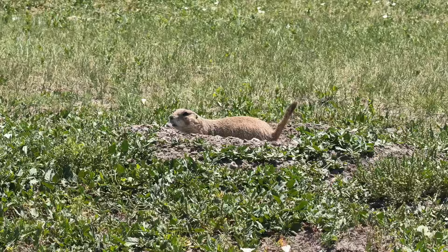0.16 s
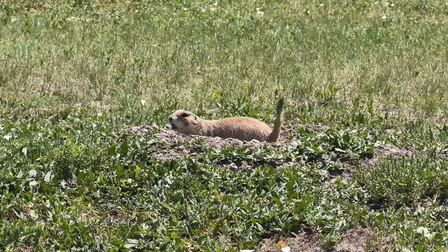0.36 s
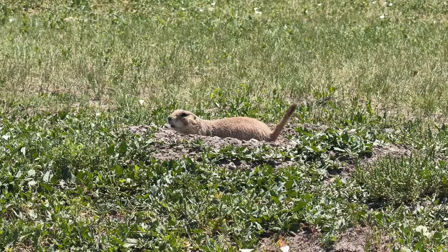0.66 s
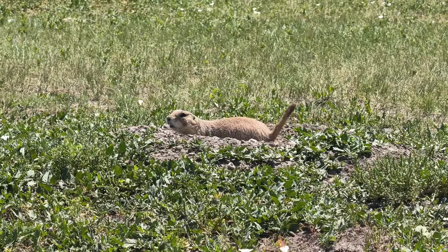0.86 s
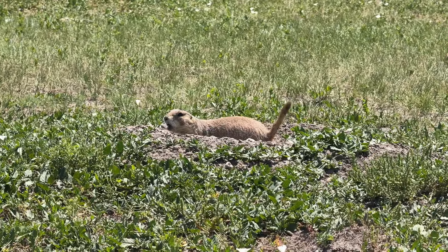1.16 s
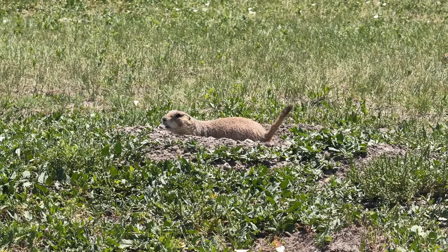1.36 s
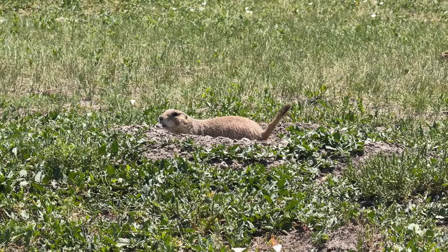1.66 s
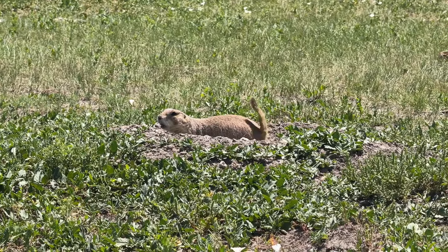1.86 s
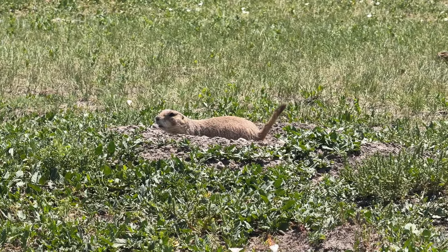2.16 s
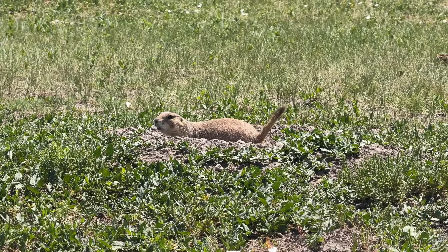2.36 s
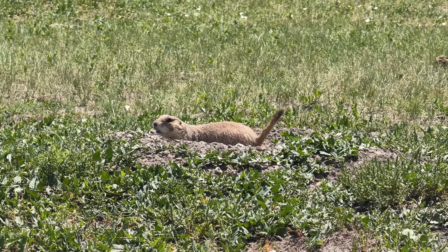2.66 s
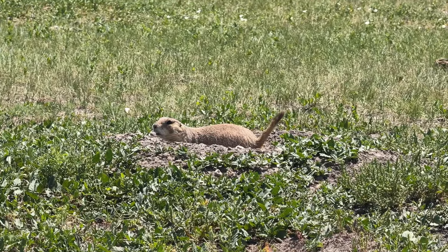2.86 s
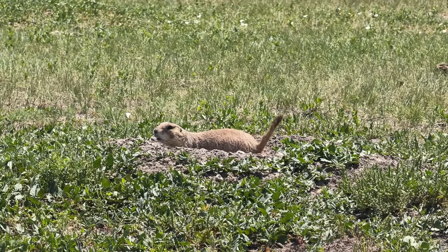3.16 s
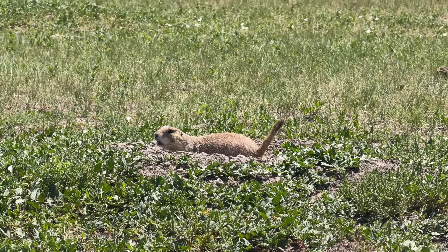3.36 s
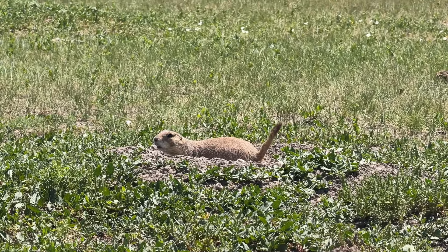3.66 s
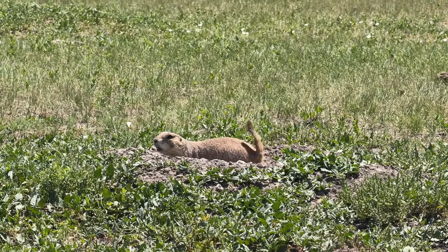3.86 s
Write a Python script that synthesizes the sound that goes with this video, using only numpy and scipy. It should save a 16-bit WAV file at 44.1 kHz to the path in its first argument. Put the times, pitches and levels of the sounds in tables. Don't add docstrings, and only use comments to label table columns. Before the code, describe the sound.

Open, dry-sounding grassland, heard through a small stereo camera microphone. A light stem tap comes at the very start, over low uneven wind rumble, very faint grass rustle and hiss. A prairie dog fairly close ahead gives seven sharp, high, squeaky barks at about 0.35, 1.13, 1.8, 2.4, 2.93, 3.38 and 3.79 seconds, gradually quickening. Each lasts only a twentieth of a second, rising quickly then falling in pitch, bright and slightly rough with a throat flutter and a puff of breath. About a tenth of a second after each comes a tiny creaky in-breath, briefly buzzing near 3.05. A distant neighbour adds thin, faint, falling whistles near 0.5, 1.3, 1.87, 2.47, 2.96 and 3.85. Wind eddies flutter and thump throughout, with the heaviest bumps from 1.9 to 2.3 seconds, then lighter buffeting until the end at about four seconds.

```python
import sys
import numpy as np
from scipy import signal
from scipy.fft import rfft, irfft, next_fast_len
from scipy.io import wavfile
from scipy.ndimage import uniform_filter1d, map_coordinates

SR = 44100
rng = np.random.default_rng(int(sys.argv[2]) if len(sys.argv) > 2 else 0)


def linear_from_db(decibels):
    return 10 ** (np.asarray(decibels, float) / 20)


def store_pcm(level_fs):
    pcm = np.round(np.clip(level_fs, -1, 1) * 32767).astype(np.int16)
    wavfile.write(sys.argv[1], SR, np.atleast_2d(pcm).T)


N = 176973


def unit(x):
    return x / np.sqrt(np.mean(x ** 2) + 1e-20)


def peak(x):
    return x / np.max(np.abs(x))


def along(points, hz):
    f, v = np.transpose(points)
    return np.interp(np.log(hz + 1), np.log(f + 1), v)


def wobble(rate, size=N):
    knots = rng.standard_normal(int(size * rate / SR) + 4)
    return map_coordinates(knots, [np.arange(size) * rate / SR])


def filtered(x, response):
    m = next_fast_len(x.shape[-1] + 8192)
    return irfft(rfft(x, m) * response(np.fft.rfftfreq(m, 1 / SR)), m)[..., :x.shape[-1]]


def noise(spectrum, size=N):
    return unit(filtered(rng.standard_normal(size), lambda hz: linear_from_db(along(spectrum, hz))))


def add(track, s, sound):
    part = track[round(s * SR):][:len(sound)]
    part += sound[:len(part)]


# freq_hz [Hz], density_db [dB per Hz]
HISS_SPECTRUM = [(1300, -24.5), (2200, -1.5), (3000, -11.5), (7300, -10), (9500, -17), (12500, -20),
                 (14400, -11), (16000, -22)]


def hiss():
    return linear_from_db(-85.5) * np.array([noise(HISS_SPECTRUM), noise(HISS_SPECTRUM)])


# freq_hz [Hz], density_db [dB per Hz]
RUSTLE_SPECTRUM = [(300, -50.5), (600, -14), (1000, -2.5), (1500, -8.5), (2400, -30.5), (4000, -89.5)]


def far_rustle():
    return linear_from_db(-79.5) * np.array([noise(RUSTLE_SPECTRUM), noise(RUSTLE_SPECTRUM)])


# freq_hz [Hz], density_db [dB per Hz]
RUMBLE_SPECTRUM = [(12, -43.5), (25, -16), (45, 3.5), (77, 3.5), (130, -7), (220, -19.5), (400, -76.5),
                   (800, -120)]
BUFFET_SPECTRUM = [(60, -32), (130, -5), (280, -7), (420, -13), (600, -19.5), (1000, -52.5), (1500, -80),
                   (2500, -120)]
FLAP_SPECTRUM = [(250, -33.5), (500, 0.5), (750, -4.5), (1100, -18), (1600, -44.5), (2400, -64),
                 (4000, -120)]
# start_s [s], level_db [dB], thump_db [dB], edge_db [dB]
EDDIES = [(0.189, -51.5, 12.5, -7), (0.265, -41, 9, -13), (0.386, -32.5, 1, -6), (.537, -37, -5, 0.5),
          (0.599, -37, -1.5, -14), (0.659, -29.5, 2.5, -15.5), (.782, -28, -23, -13), (.936, -44, -6, -2.5),
          (1.018, -34.5, -25, -17.5), (1.067, -35, -4.5, -13), (1.27, -40.5, -7, -4.5),
          (1.426, -41.5, -9, -6.5), (1.599, -36, 5, -2.5), (1.749, -39, 8.5, -12.5),
          (1.816, -29, 6.5, -25.5), (1.917, -12, 1.5, -28.5), (1.984, -36.5, 18.5, -40),
          (2.043, -19, 1, -29), (2.161, -13.5, -9, -26), (2.305, -18.5, 3, -18), (2.451, -31.5, 7, -5.5),
          (2.499, -32, 12, -5.5), (2.56, -31, 1, -10), (2.61, -28.5, -3, -11.5), (2.738, -31.5, -20, -19.5),
          (2.85, -33.5, -6.5, -10.5), (2.998, -34, 0, -7.5), (3.199, -33.5, -10, -11.5),
          (3.258, -28.5, -17, -18), (3.312, -30, -1.5, -5.5)]
SMALL_EDDIES = [.215, .476, .5, .715, .827, 1.095, 1.151, 1.358, 1.39, 1.501, 1.67, 1.896, 2.089, 2.145,
                2.205, 2.322, 2.39, 2.677, 2.96, 3.147, 3.376, 3.478, 3.516, 3.785, 3.923, 3.968]


def eddies(stir_db):
    out = np.zeros(N)
    t = np.arange(SR // 12) / SR
    swell = lambda rise_s: (t / rise_s) ** 2 * np.exp(2 - 2 * t / rise_s)
    strikes = list(EDDIES)
    scatter_db = 1.5 * rng.standard_normal((len(SMALL_EDDIES), 3))
    for s, (level, thump, edge) in zip(SMALL_EDDIES, scatter_db):
        strikes.append((s, stir_db[round(s * SR)] - 3.5 + level, 6 + thump, -11 + 2 * edge))
    for s, db, thump_db, edge_db in strikes:
        body = peak(swell(.0045) * noise(BUFFET_SPECTRUM, len(t)))
        edge = peak(swell(.0032) * noise(FLAP_SPECTRUM, len(t)))
        ruffle = body + linear_from_db(edge_db + 1.5) * edge
        roll_hz = 70 * np.exp(rng.normal(0, .2)) * (1 + 7.5 * np.exp(-t / .006))
        roll = np.sin(2 * np.pi * (np.cumsum(roll_hz) / SR + rng.random())) * swell(.012)
        add(out, s - .002, linear_from_db(db + 2.14) * ruffle + linear_from_db(db + thump_db - 3) * roll)
    return out


# start_s [s], strength_db [dB], turbulence_db [dB]
WIND = [(0, -34, -20), (.07, -46, -8.5), (.18, -50, -9), (.22, -39, -0.5), (.56, -33.5, -2.5),
        (.98, -37.5, -6.5), (1.29, -38, -2.5), (1.68, -43.5, 5), (1.82, -33.5, -11), (1.94, -28.5, 0.5),
        (2.37, -29.5, -4), (2.55, -33.5, 2), (2.76, -41.5, -1), (3.04, -39.5, -3), (3.45, -42.5, 4.5),
        (3.6, -43, -6.5), (3.88, -49, 0.5), (4.01, -38.5, 2.5)]
# start_s [s], lift_db [dB]
SURGES = [(.22, 2), (0.329, 8.5), (.56, 4), (.69, 1.5), (0.802, 6), (.97, 7), (1.23, 3), (1.301, 9),
          (1.78, 8.5), (1.904, 17), (2.052, 10.5), (2.172, 8), (2.33, 13), (2.519, 6.5), (2.659, 12.5),
          (2.87, 5), (3.021, 12), (3.34, 5.5)]


def wind():
    surge_s = 0.015
    surge_stirs = 1.3
    flap_grows, flap_stirs = 0.18, 1.6
    t = np.arange(N) / SR
    s, *controls = np.transpose(WIND)
    strength_db, turbulence_db = [np.interp(t, s, c) for c in controls]
    surge_db = sum(db * np.exp(-((t - s) / surge_s) ** 2) for s, db in SURGES)
    mean_db = strength_db.mean()
    rumble_db = strength_db + surge_db
    buffet_db = strength_db + turbulence_db + surge_stirs * surge_db - 11
    flap_db = mean_db + flap_grows * (strength_db - mean_db) + flap_stirs * turbulence_db - 34
    lump = wobble(22)
    rumble = linear_from_db(rumble_db - 0.5) * unit(linear_from_db(0.71 * wobble(9)) * noise(RUMBLE_SPECTRUM))
    buffet = linear_from_db(buffet_db - 0.5) * unit(linear_from_db(3.8 * lump + 0.83 * wobble(66)) * noise(BUFFET_SPECTRUM))
    flap = linear_from_db(flap_db + 1) * unit(linear_from_db(5 * lump + 8 * wobble(48)) * noise(FLAP_SPECTRUM))
    return rumble + buffet + flap + eddies(strength_db + turbulence_db)


# start_s [s], pitch_hz [Hz], level_db [dB]
STEM_TAPS = [
    (0.035, 1090, -41.5),
    (.057, 1000, -71),
]


def stem_taps():
    out = np.zeros(N)
    t = np.arange(SR // 50) / SR
    for s, hz, db in STEM_TAPS:
        strike = 1 - np.exp(-t / .00036)
        add(out, s, linear_from_db(db - 60 * t / .0053) * strike * np.sin(2 * np.pi * hz * t))
    return out


# start_s [s], length_s [s], pitch_hz [Hz, top], sag_hz [Hz], level_db [dB]
WHISTLES = [
    (.501, .04, 2375, 295, -83),
    (1.293, .042, 2705, 235, -64),
    (1.87, .053, 2685, 400, -60),
    (2.465, .038, 2685, 300, -59),
    (2.96, .038, 2650, 215, -63),
    (3.845, .041, 2680, 265, -65),
]
# freq_hz [Hz], gain_db [dB]
FAR_THROAT = [(6000, -8), (7000, 0), (7700, -11), (8200, -15)]


def neighbour():
    crest_s, sag_s = .011, .029
    out = np.zeros(N)
    for s, length, top_hz, sag_hz, db in WHISTLES:
        t = np.arange(round(length * SR)) / SR
        u = t / length
        sag = sag_hz * np.clip((t - crest_s) / sag_s, 0, None) ** 1.7
        rise = 0.035 * top_hz * np.clip(1 - t / crest_s, 0, 1) ** 2
        pitch = top_hz - sag - rise
        turn = 2 * np.pi * np.cumsum(pitch) / SR
        tone = linear_from_db(-19.5) * np.sin(turn) + np.sin(2 * turn)
        tone += linear_from_db(along(FAR_THROAT, 3 * pitch)) * np.sin(3 * turn)
        tone += linear_from_db(-17.5 - 10 * u) * np.sin(4 * turn)
        fade = np.clip(np.minimum(u / .15, (1 - u) / .087), 0, 1)
        add(out, s, linear_from_db(db + 3 - 7 * u + 1.5 * wobble(160, len(u))) * fade * tone)
    return out


# [dB, first snap]
CREAKS = [(.432, 1, .01, -71), (.461, 4, .0105, -65), (1.222, 2, .024, -69), (1.271, 5, .0078, -61),
          (1.905, 6, .010, -61), (2.529, 8, .0048, -52), (2.5745, 2, .009, -60), (3.066, 7, .0062, -57),
          (3.507, 2, .012, -63), (3.913, 1, .01, -64), (3.927, 4, .008, -60)]
# start_s [s], length_s [s], pitch_hz [Hz], level_db [dB]
GASP = (3.044, .016, 877.5, -52)
# freq_hz [Hz], width_hz [Hz], gain_db [dB]
NOSE = [(950, 320, -15), (2740, 420, -3), (5000, 690, -18), (6960, 950, -18), (10900, 870, -14)]
# freq_hz [Hz], gain_db [dB]
NOSTRIL = [(1200, 15.5), (1700, -2), (2300, -1.5), (3200, -4.5), (4000, -11), (7000, -3.5), (9000, -21),
           (11200, -3), (13000, -26)]


def nose_response(hz):
    ring = 0
    for k, (centre, width, db) in enumerate(NOSE):
        loss = 1j * hz * width
        ring = ring + (-1) ** k * linear_from_db(db) * loss / (centre * centre - hz * hz + loss)
    return ring * linear_from_db(along(NOSTRIL, hz))


def inbreath():
    snap_fade_db_per_s, snap_scatter_db, gap_scatter = 200, 2, .1
    snaps = np.zeros(N)
    t = np.arange(SR // 30) / SR
    for start, count, gap, first_db in CREAKS:
        order = np.arange(round(count))
        chance = rng.standard_normal((len(order), 2)) * (order > 0)[:, None]
        after = gap * (order + gap_scatter * chance[:, 0])
        levels_db = first_db - snap_fade_db_per_s * after + snap_scatter_db * chance[:, 1]
        for s, db in zip(start + after, levels_db):
            stream = linear_from_db(-27) * np.hanning(len(t)) * rng.standard_normal(len(t))
            snap = linear_from_db(-60 * t / .0006) * (1 + 0.45 * rng.standard_normal(len(t)))
            add(snaps, s, linear_from_db(db + 25.5) * (stream + snap))
    s, length, pitch_hz, db = GASP
    t = np.arange(round(length * SR)) / SR
    pulses = np.exp(5.8 * (np.cos(2 * np.pi * pitch_hz * t) - 1))
    add(snaps, s, linear_from_db(db + 16.5) * np.hanning(len(t)) ** 0.63 * pulses)
    return filtered(snaps, nose_response)


# start_s [s], length_s [s], pitch_hz [Hz, top], level_db [dB]
BARKS = [
    (0.3452, 0.051, 1870, -20),
    (1.1341, 0.051, 1902, -18),
    (1.7959, 0.049, 1901, -19.5),
    (2.403, 0.051, 1872, -19),
    (2.9325, 0.049, 1944, -18),
    (3.3767, 0.052, 1899, -20),
    (3.7942, 0.051, 1912, -18),
]
# rate_hz [Hz], start_s [s after onset], pitch_loss [share when it grips], depth_db [dB]
GRIPS = [(350, .014, .035, 2.5), (390, .013, .005, .5), (335, .010, .02, 1.5), (330, .009, .002, 1.5),
         (385, .011, .025, .5), (380, .013, .04, 3), (380, .006, .002, 1.5)]
PITCH_ARCH = [(0, .81), (.05, .885), (.12, .94), (.27, 1.005), (.5, .98), (.7, .925), (.81, .875),
              (.9, .78), (1.02, .66)]
# length_share [ratio], effort_db [dB], breath_db [dB]
PUSH = [(0, -15.5, -7), (.09, -6, -24), (.27, 3.5, -30.5), (.5, 2.5, -17.5), (.76, -2.5, -8),
        (.97, -14, -14), (1.04, -35.5, -9.5), (1.26, -49, -12), (1.33, -66.5, -4.5)]
# freq_hz [Hz], gain_db [dB]
THROAT = [(900, -44), (1800, -12), (2700, -3.5), (3700, -0.5), (4700, -9), (5600, -7.5), (7200, -17),
          (9000, -23.5), (10000, -38), (11200, -22.5), (12500, -46.5), (13400, -30.5), (14800, -31.5),
          (16000, -62)]
# flutter_multiple [count], level_db [dB]
SIDE_TONES = [(-2, -29), (-1, -19), (1, -8), (2, -19)]
# freq_hz [Hz], gain_db [dB]
BREATH = [(900, -20.5), (1900, -16.5), (2700, -10.5), (3800, 2.5), (4700, -20.5), (6200, -1), (7600, -13.5),
          (9000, -21), (9900, -40), (11200, -17.5), (12500, -47.5), (13400, -32.5), (14800, -31.5),
          (15800, -56)]
# freq_hz [Hz], half_width_hz [Hz], depth_db [dB]
MOUTH_POCKETS = [(9950, 260, 16), (12550, 380, 22)]


def fluttering_voice(u, pitch, fold, flutter, flap, grown, grip_db):
    voice = np.zeros(len(u))
    slack_db = -3.5 * np.clip((u - .3) / 2.1, 0, 1)
    for k in range(1, 10):
        slack_steps = max(k - 2, 0)
        tone_db = along(THROAT, k * pitch) - 2.9 * grown + slack_steps * slack_db
        voice += linear_from_db(tone_db) * np.cos(k * fold + 0.49 * k * k)
        overtone_db = 2.8 * np.log2(min(k, 3)) - 5 * (k == 1) + 5.8 * (k > 5)
        for m, side_db in SIDE_TONES:
            shake_db = 2.5 * wobble(200, len(u)) - 4
            depth_db = side_db + slack_steps * 1.1 * slack_db + grip_db + shake_db + overtone_db
            throat_gain = linear_from_db(along(THROAT, k * pitch + m * flutter))
            phase = k * fold + 0.37 * k * k + m * flap + 0.67 * m * m
            voice += grown * linear_from_db(depth_db) * throat_gain * np.cos(phase)
    return voice


def mouth_response(hz):
    return linear_from_db(-sum(db * np.exp(-((hz - centre) / width) ** 2) for centre, width, db in MOUTH_POCKETS))


def barks():
    out = np.zeros(N)
    t = np.arange(SR // 10) / SR
    share, effort_db, breath_db = np.transpose(PUSH)
    for (s, length, top_hz, db), (flutter_hz, start, sag, grip_db) in zip(BARKS, GRIPS):
        u = t / length
        grown = np.clip((t - start) / .006, 0, 1)
        arch = uniform_filter1d(np.interp(u, *np.transpose(PITCH_ARCH)), size=120, mode='nearest')
        grip = 1 - sag * grown * np.clip(3 - 2.9 * u, 0, 1) + 0.012 * grown * wobble(500, len(t))
        pitch = top_hz * arch * grip
        flutter = flutter_hz * (1 + 0.077 * wobble(160, len(t)))
        fold, flap = 2 * np.pi * np.cumsum([pitch, flutter], axis=1) / SR
        voice = fluttering_voice(u, pitch, fold, flutter, flap, grown, grip_db)
        gate = (1 + .8 * np.cos(fold)) * (1 + 0.38 * grown * np.cos(flap))
        air = gate * rng.standard_normal(len(t))
        breath = unit(filtered(air, lambda hz: linear_from_db(along(BREATH, hz))))
        sound = voice * np.clip((1 - u) / .016, 0, 1) + linear_from_db(np.interp(u, share, breath_db)) * breath
        add(out, s, linear_from_db(db + 0.5 + np.interp(u, share, effort_db)) * sound)
    return filtered(out, mouth_response)


def ground(x, t60, db):
    t = np.arange(SR // 4) / SR
    tail = rng.standard_normal((2, len(t))) * linear_from_db(-60 * t / t60)
    return linear_from_db(db) * signal.fftconvolve(x[None], tail / np.linalg.norm(tail[0]), axes=1)[:, :N]


# freq_hz [Hz], gain_db [dB]
PORT_DIFFERENCE = [(700, -37), (1300, -21.5), (2400, -12), (4400, -10.5), (7000, -25), (9000, 3),
                   (15000, -2)]


def scene():
    calls = barks() + inbreath() + neighbour()
    apart = filtered(calls, lambda hz: 1j * linear_from_db(along(PORT_DIFFERENCE, hz)))
    bright = filtered(calls, lambda hz: linear_from_db(-.6 * np.maximum(along(THROAT, hz), -30)))
    echoes = ground(calls, t60=.035, db=-38) + ground(bright, t60=0.4, db=-49)
    return calls + apart * [[1], [-1]] + echoes + wind() + stem_taps() + far_rustle() + hiss()


def low_pass(x):
    return signal.sosfilt(signal.butter(12, 16300, fs=SR, output="sos"), x)


def record(dry):
    top_hz = 15850
    ease = np.clip(np.minimum(np.arange(N) + 1, N - np.arange(N)) / 250, 0, 1)
    mix = filtered(dry * ease, lambda hz: hz < top_hz)
    return low_pass(mix)


dry = scene()
out = record(dry)
store_pcm(out)
```